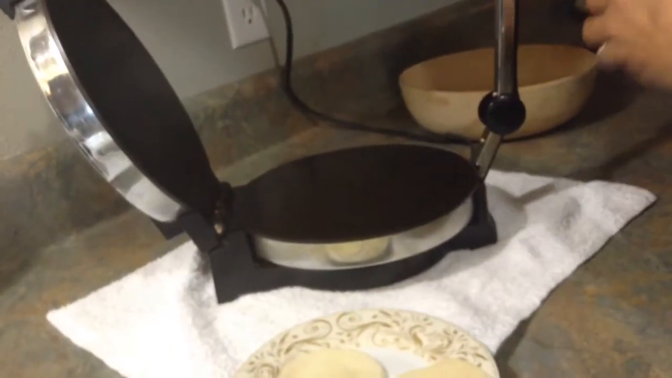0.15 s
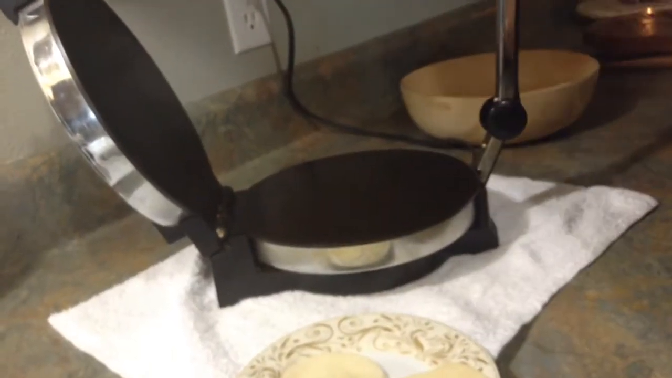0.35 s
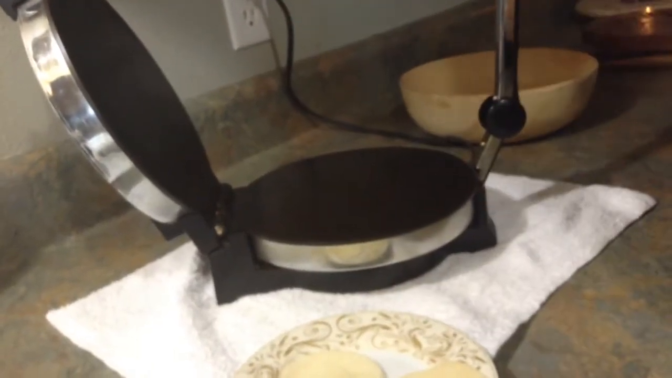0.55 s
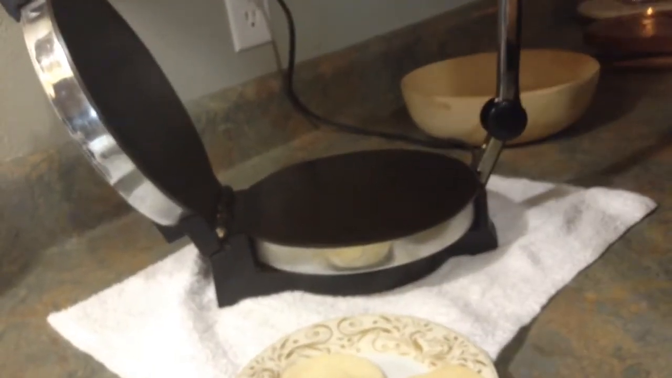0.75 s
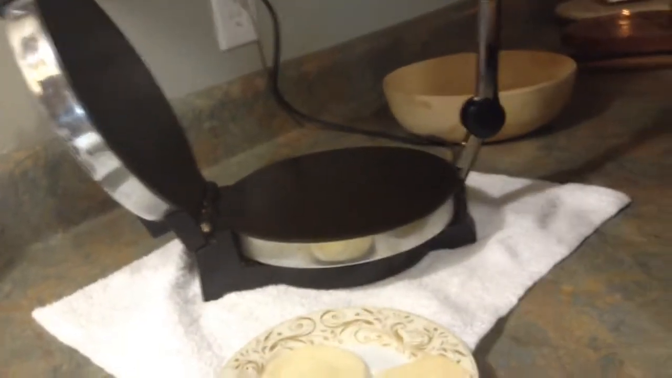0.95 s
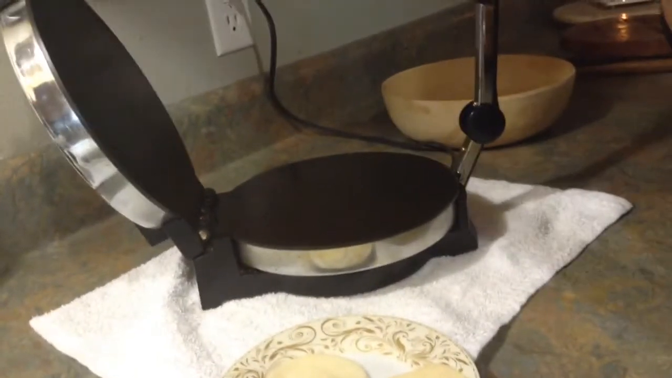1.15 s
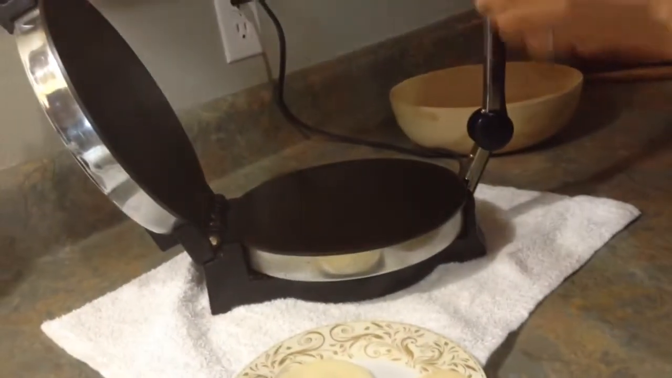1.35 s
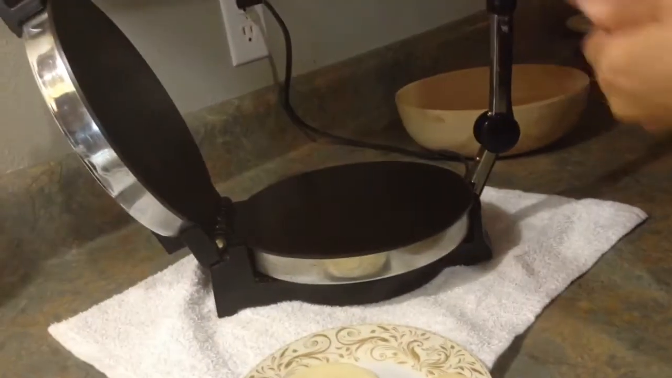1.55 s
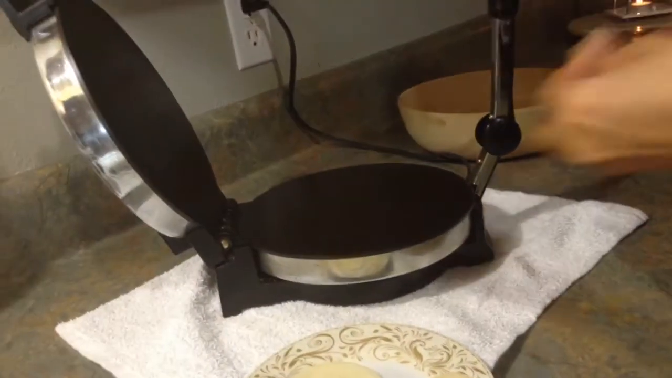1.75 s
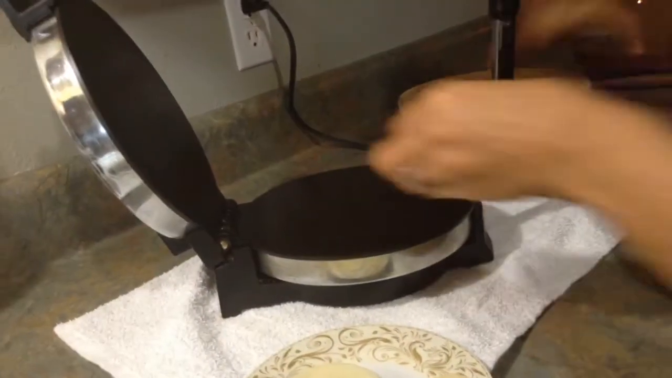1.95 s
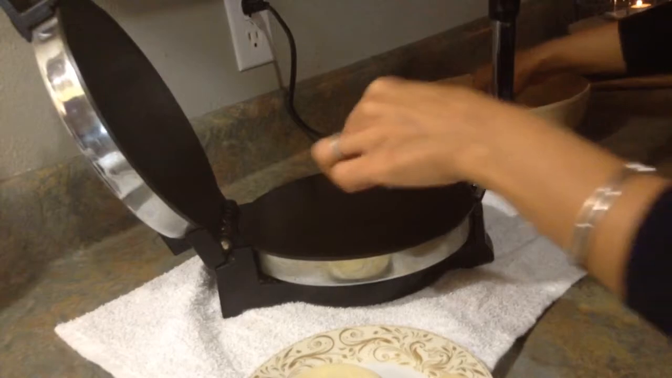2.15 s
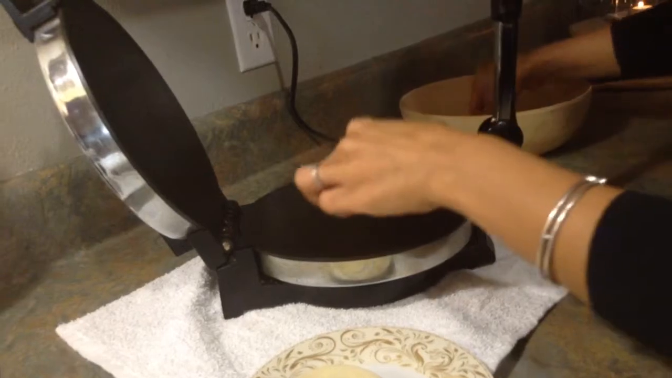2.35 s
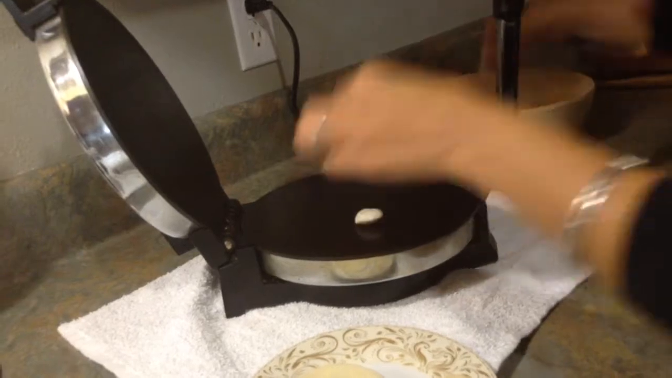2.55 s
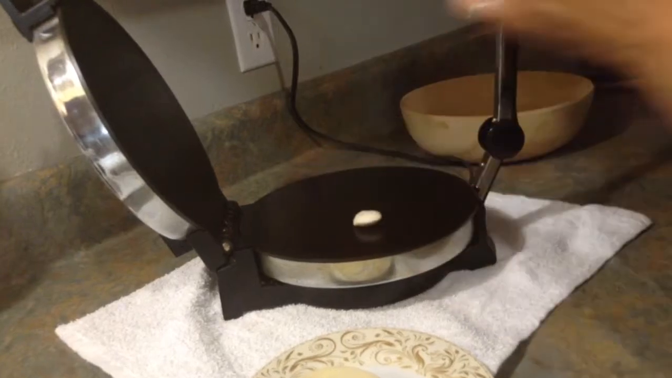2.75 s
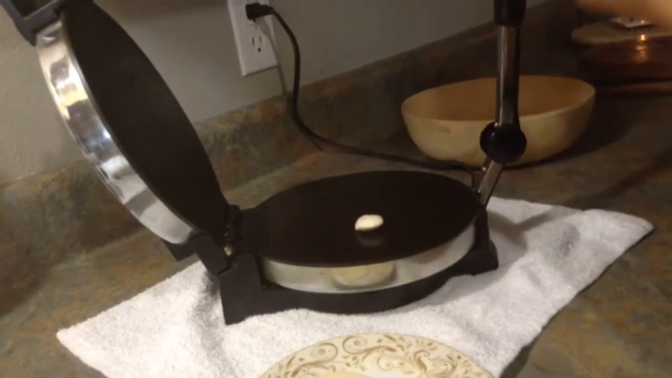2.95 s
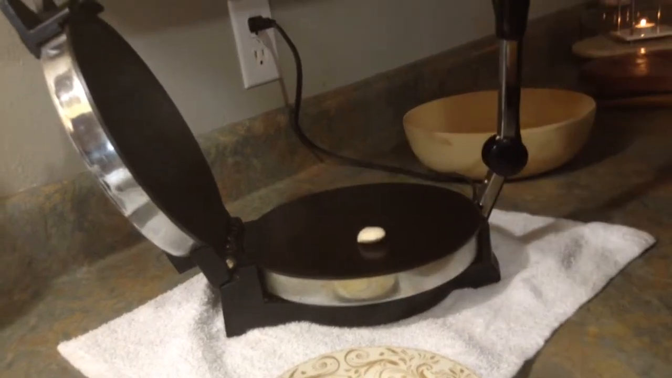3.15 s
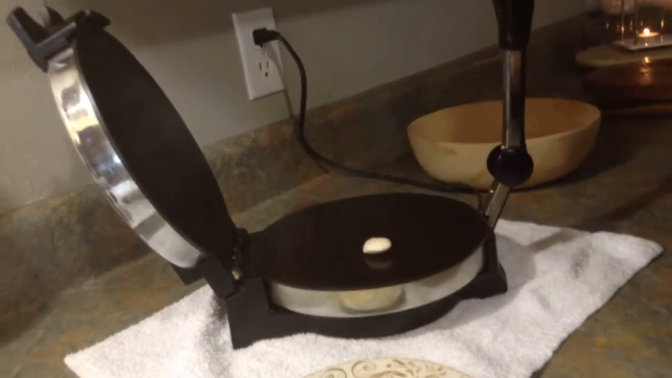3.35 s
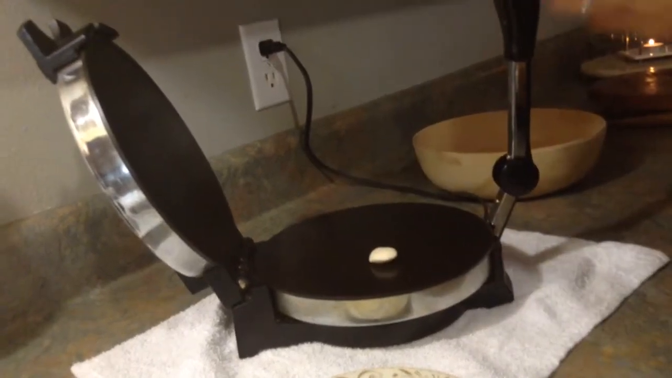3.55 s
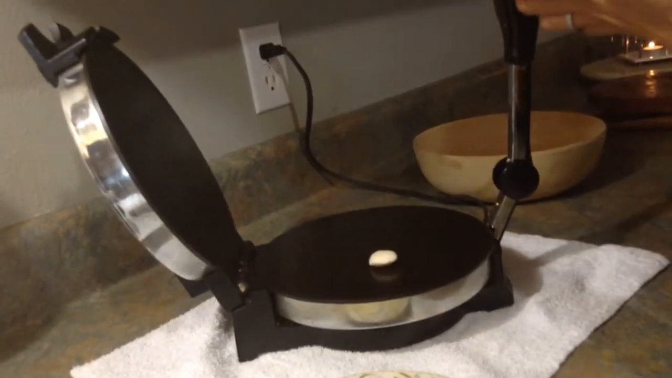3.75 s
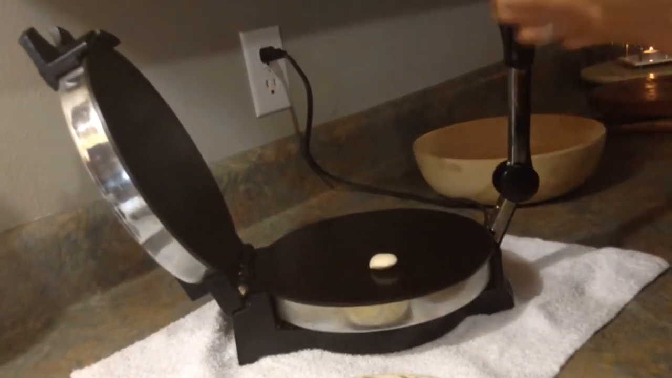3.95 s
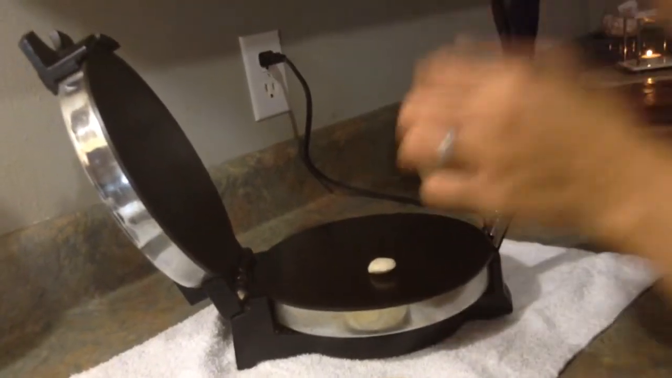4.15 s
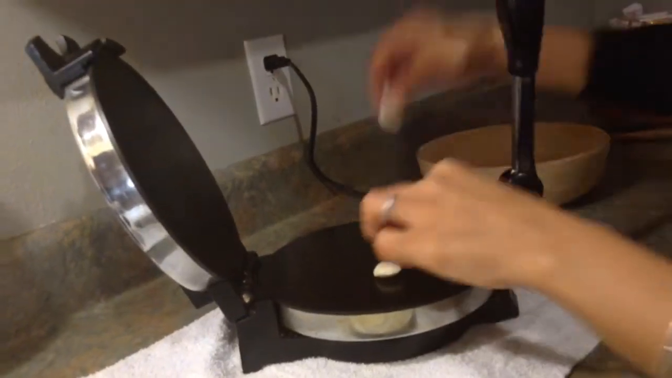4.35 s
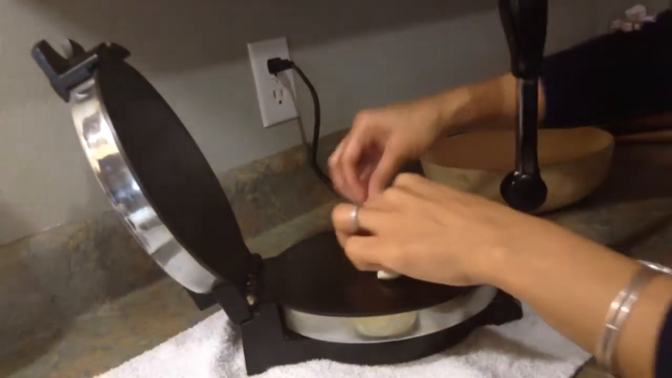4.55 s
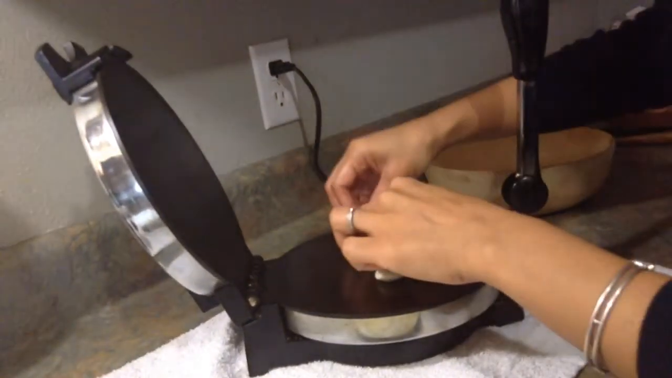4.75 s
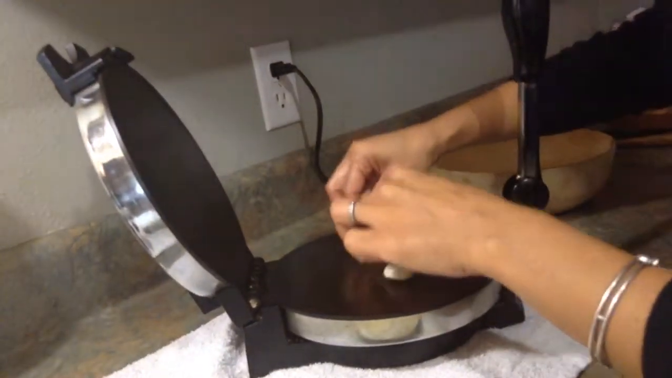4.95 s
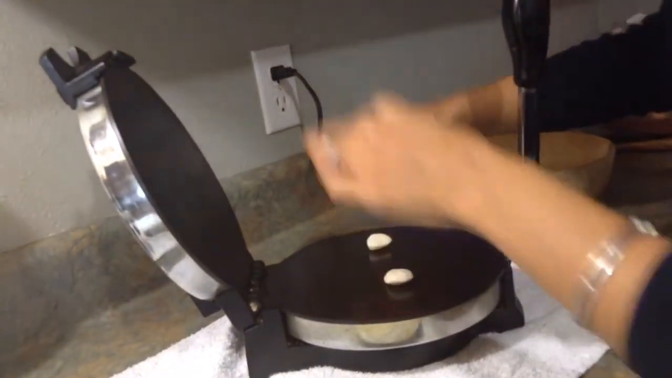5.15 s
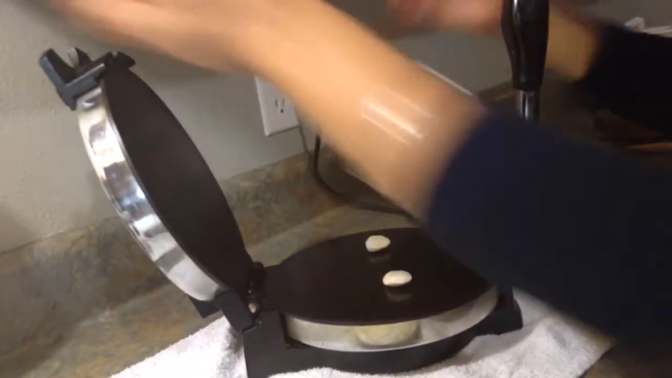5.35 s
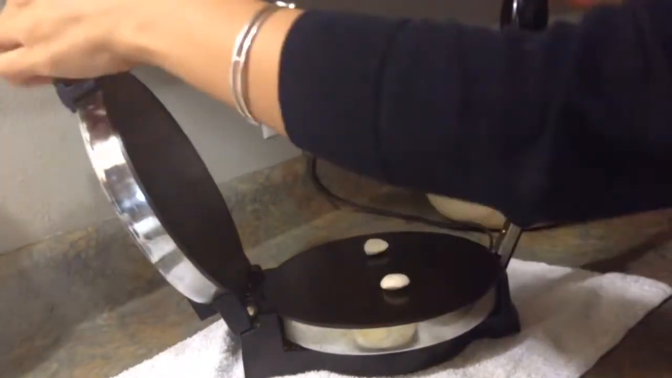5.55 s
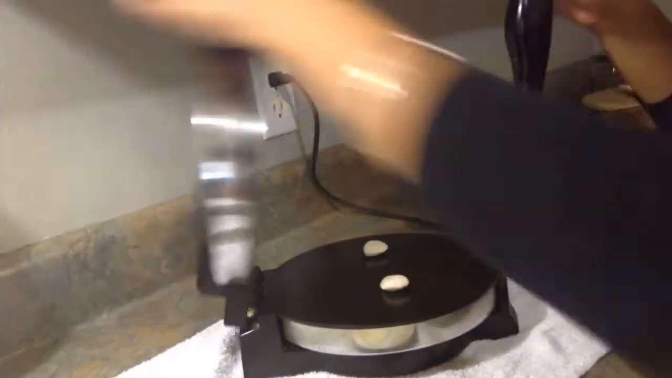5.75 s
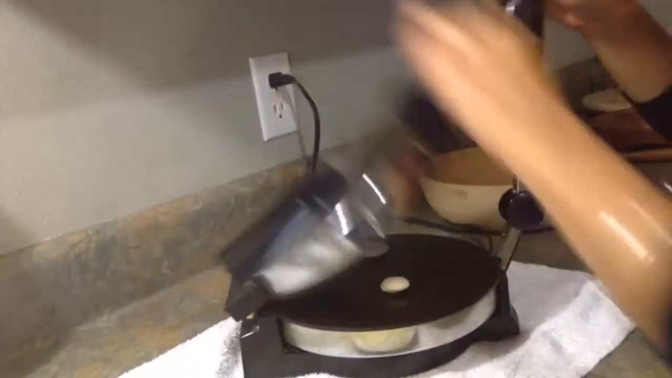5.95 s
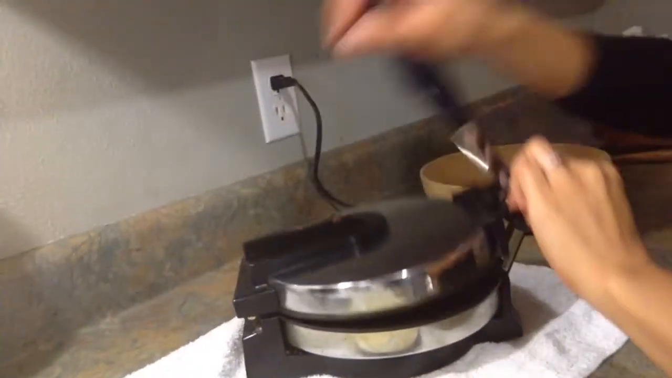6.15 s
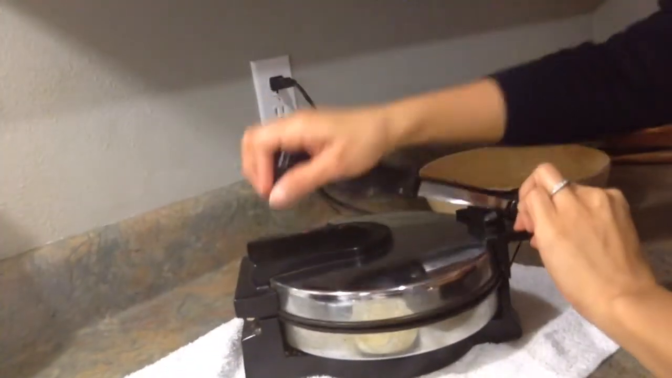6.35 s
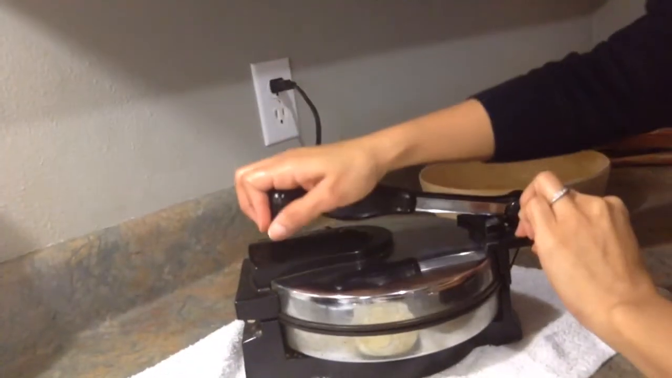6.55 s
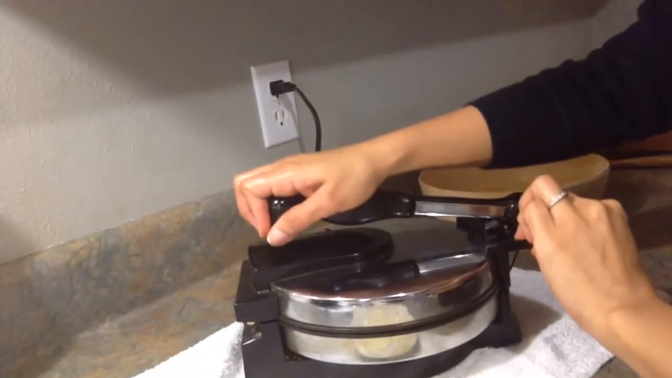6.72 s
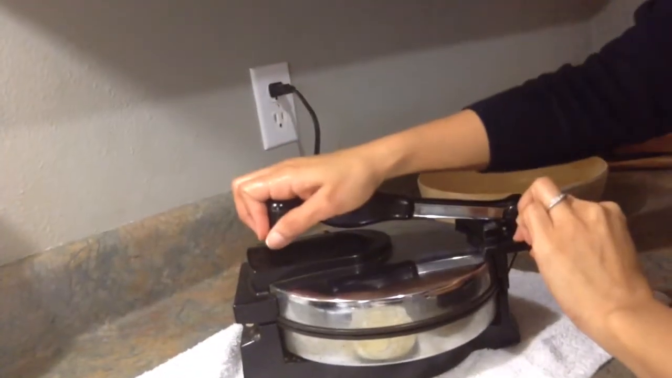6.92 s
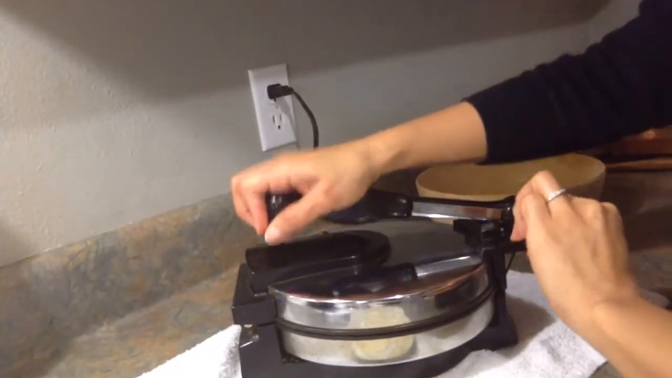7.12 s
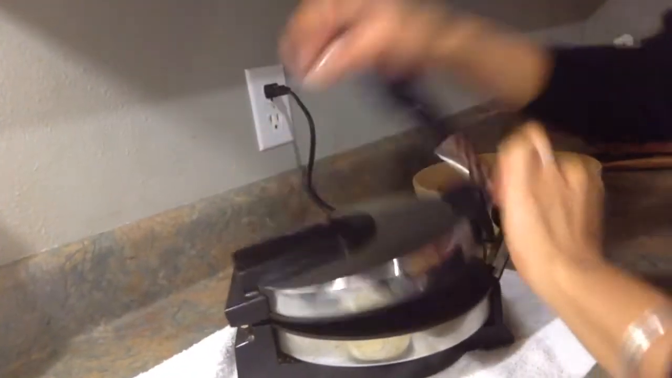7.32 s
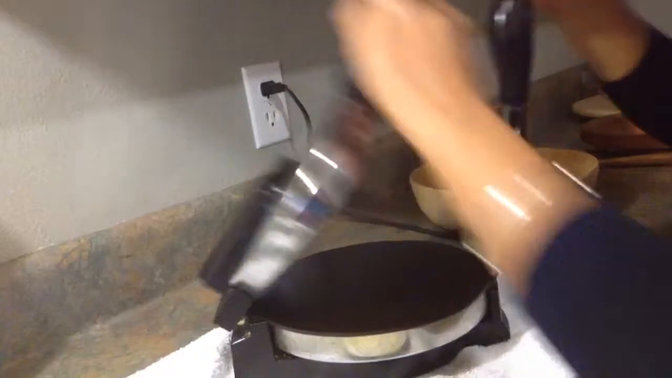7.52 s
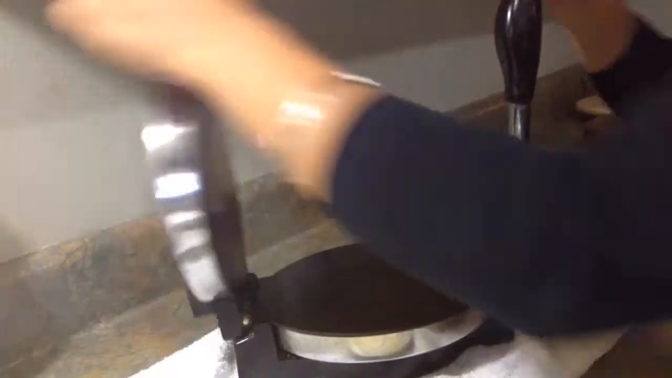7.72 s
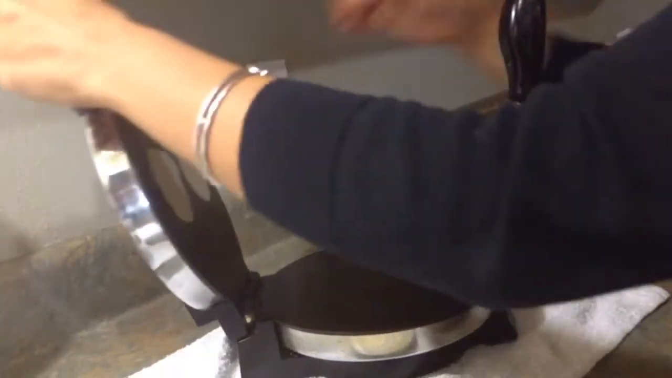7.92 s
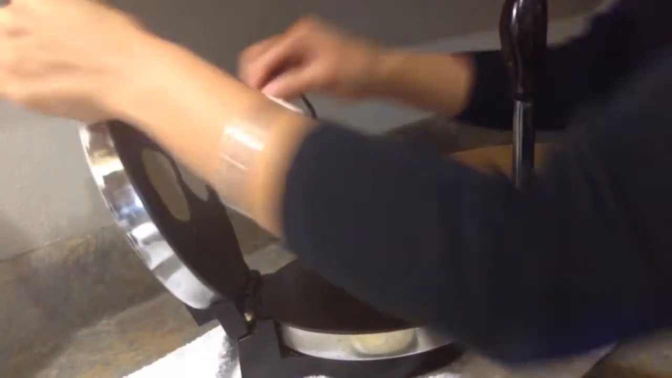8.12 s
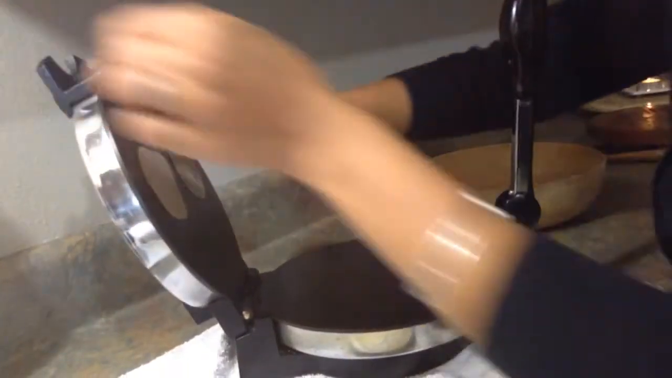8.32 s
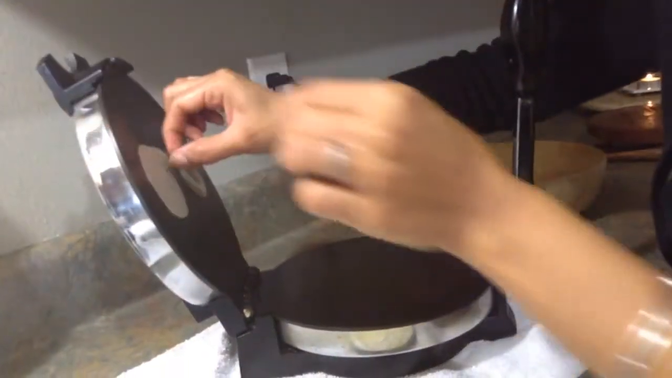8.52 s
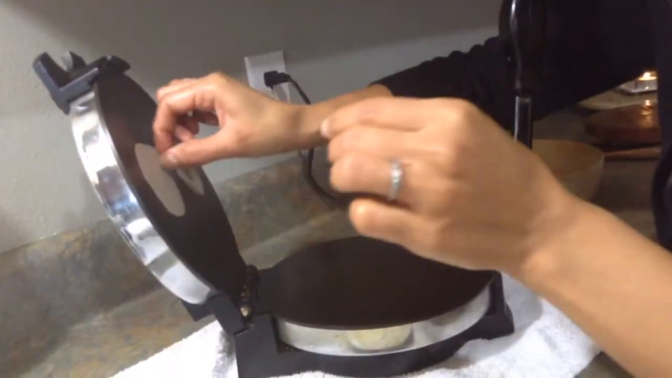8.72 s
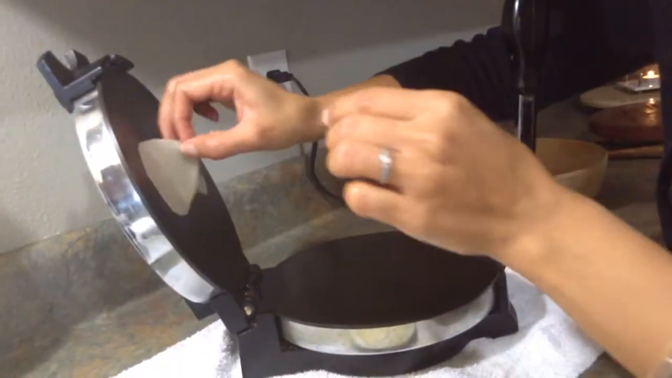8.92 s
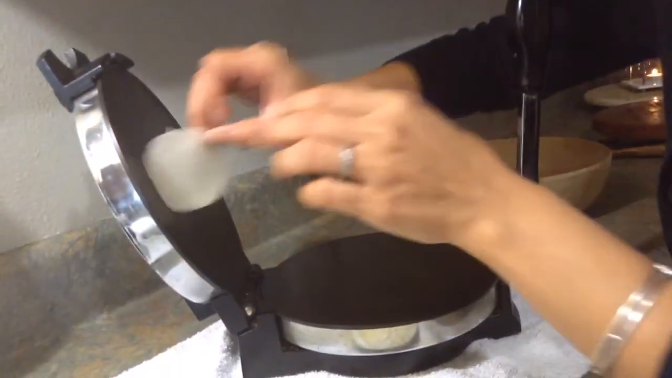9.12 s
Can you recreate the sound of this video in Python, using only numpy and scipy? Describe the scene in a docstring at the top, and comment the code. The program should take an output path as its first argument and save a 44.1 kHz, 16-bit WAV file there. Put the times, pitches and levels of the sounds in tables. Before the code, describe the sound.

A faint hum and soft room air run through a quiet kitchen, with the action close by. From about 0.5 to 1 second, palms rub dough with a dry, hissing swish. Soft pats, tiny ticks and faint bowl clinks follow, then a second rub from 3 to 3.5 seconds. Light finger strokes and ticks continue until 5 seconds, as a faint low drone creeps in. At 5.5 seconds the hinge of a tortilla press knocks softly, and at 6.2 the metal lid shuts with a sharp clank, the loudest sound. For the next second the dough sizzles softly while the lever gives a string of dry clicks and tiny squeaks. A second clank comes at 7.2 seconds as the press is released, then a short squeak. Soft knocks and dull rustles follow until about 8.5 seconds as the lid swings open. A sleeve brushes past around 9 seconds.

```python
"""Dough is rubbed and patted between the palms, then an electric tortilla press clanks shut in a quiet kitchen.
The rubbing is countless tiny slips of skin, coloured by the gap between the hands; a bowl clinks lightly.
The lid knocks ring the metal plates and shake the counter. The lever clicks and squeaks under load
while moisture sizzles out of the dough, and the press is opened again.
A faint hum fills the room; a low drone joins it in the second half."""
import sys
import numpy as np
from scipy import signal
from scipy.fft import rfft, irfft, next_fast_len
from scipy.io import wavfile

SR = 44100
rng = np.random.default_rng(int(sys.argv[2]) if len(sys.argv) > 2 else 0)


def store_pcm(level_fs):
    """Save levels as 16-bit WAV."""
    pcm = np.round(np.clip(level_fs, -1, 1) * 32767).astype(np.int16)
    wavfile.write(sys.argv[1], SR, np.atleast_2d(pcm).T)


N = 409233
TIME = np.arange(N) / SR
RING_TIME = TIME[:SR // 2]

# lid on hinge, stop and lower plate; harder contact, higher cutoff:
# (time [s], level [dB], cutoff [Hz], pitch of struck part [Hz], counter thud level [dB])
LID_KNOCKS = [(5.527, -50, 1670, 1290, -57), (5.57, -50.5, 1880, 1020, -55.5), (5.614, -53, 1490, 683, -59),
              (6.238, -18, 3900, 1470, -44), (7.204, -25, 2740, 1080, -48.5),
              (7.3645, -44.5, 6040, 2400, -51), (7.508, -49, 2100, 2840, -52),
              (7.878, -51.5, 863, 1105, -49.5), (7.931, -53, 2300, 2640, -57.5),
              (8.136, -48.5, 2120, 1710, -66)]
# dense, short-lived modes of an impact: (frequency [Hz], density [dB])
CRACK_SPECTRUM = [(30, -45), (150, -16), (300, -6), (700, 0), (1500, -3), (2800, 1), (4500, 0), (6500, 0),
                  (9500, -2), (11500, -12), (13500, 1), (16000, 0)]


def amp(db):
    """Decibels to gain."""
    return np.exp(np.asarray(db) * (np.log(10) / 20))


def unit(x):
    """Scales to rms 1."""
    return x / np.sqrt(np.mean(x ** 2) + 1e-20)


def struck(x, size=350):
    """Scales the first samples of a blow (8 ms by default) to rms 1."""
    return x / np.sqrt(np.mean(x[:size] ** 2))


def read(points, hz):
    """Interpolates a table on a log-frequency axis."""
    f, value = np.transpose(points)
    return np.interp(np.log(hz + 1), np.log(f + 1), value)


def colour(x, spectrum):
    """Imposes a spectrum; rms 1."""
    size = next_fast_len(len(x))
    gain = amp(read(spectrum, np.fft.rfftfreq(size, 1 / SR)))
    return unit(irfft(rfft(x, size) * gain, size)[:len(x)])


def cut(x, hz, kind, order=2):
    """Butterworth low-pass or high-pass."""
    return signal.sosfilt(signal.butter(order, min(hz, SR / 2 - 100), kind, fs=SR, output="sos"), x)


def resonate(x, hz, width_hz, order=1):
    """Resonance that can follow a moving frequency."""
    carrier = np.exp(2j * np.pi * np.cumsum(hz * np.ones(len(x))) / SR)
    pole = np.exp(-np.pi * width_hz / SR)
    baseband = signal.lfilter([(1 - pole) ** order], np.poly([pole] * order), x * carrier.conj())
    return 2 * (carrier * baseband).real


def fuzzy_tone(hz, width_hz, size=N):
    """Noise narrowed to one wavering line."""
    return unit(resonate(rng.standard_normal(size), hz, width_hz, order=2))


def grainy(rate_per_s, spread_db, share):
    """Smooth noise plus uneven grains that carry the given share of the power."""
    grains = rng.standard_normal(N) * (rng.random(N) < rate_per_s / SR)
    grains *= amp(spread_db * np.minimum(rng.exponential(1, N), 4))
    return np.sqrt(share) * unit(grains) + np.sqrt(1 - share) * rng.standard_normal(N)


def patchy(x, depth_db):
    """Random time-frequency patches swell and fade."""
    spectra = signal.stft(x, SR, nperseg=512, noverlap=384)[2]
    patch = np.outer(np.hanning(22), np.hanning(14))  # bins by frames
    field = unit(signal.fftconvolve(rng.standard_normal(spectra.shape), patch, "same"))
    return unit(signal.istft(spectra * amp(depth_db * field), SR, nperseg=512, noverlap=384)[1][:N])


def decay(t60_s, t=RING_TIME):
    """Exponential fall, 60 dB in t60_s."""
    return amp(-60 * t / t60_s)


def attack(rise_s):
    """Exponential rise to 1."""
    return 1 - np.exp(-RING_TIME / rise_s)


def envelope(start_s, hold_s, rise_s, release_s, fade_db_per_s):
    """Linear rise and release on a steady fade; the release begins hold_s after the start."""
    t = TIME - start_s
    gate = np.clip(t / rise_s, 0, 1) * np.clip(1 - (t - hold_s) / release_s, 0, 1)
    return gate * amp(-fade_db_per_s * np.maximum(t, 0))


def swells(rows):
    """One smooth swell per (middle [s], level [dB], length [s])."""
    return sum(amp(db) * np.cos(np.pi * np.clip((TIME - s) / length_s, -.5, .5)) ** 2
               for s, db, length_s in rows)


def ring(modes, uneven_db, detune=0):
    """Decaying modes, weighted and optionally detuned at random for each blow."""
    weight, offset = rng.standard_normal((2, len(modes)))
    out = np.zeros(len(RING_TIME))
    for k, (hz, db, t60_s) in enumerate(modes):
        tone = np.sin(2 * np.pi * hz * (1 + detune * offset[k]) * RING_TIME)
        out += (-1) ** k * amp(db + uneven_db * weight[k]) * decay(t60_s) * tone
    return out


def add(mix, s, sound):
    """Mixes a sound in at time s."""
    part = mix[round(s * SR):][:len(sound)]
    part += sound[:len(part)]


def background(air_db=-71, hum_hz=241, hum_db=-78.5, hum_dip_db=-6.5):
    """Steady air, a wavering hum, and a low drone; the hum weakens as the drone grows."""
    # room air: (frequency [Hz], density [dB])
    air_spectrum = [(20, -44), (60, -28), (100, -13), (150, -1.5), (220, -5.5), (320, -8), (900, -8),
                    (1500, -14), (3000, -16), (4500, -14), (7000, -16.5), (16000, -15.5)]
    # drone growth: (time [s], level [dB])
    drone_levels = [(3.4, -105), (4.5, -83), (5.5, -74.5), (7.0, -75), (7.4, -66)]
    # drone lines: (frequency [Hz], width [Hz], level [dB])
    drone_modes = [(78.5, 4.3, -10.5), (120, 25, -10.5), (150.5, 49, -2), (195.4, 13, -2.5)]
    air = amp(air_db) * colour(rng.standard_normal(N), air_spectrum)
    drone_db = np.interp(TIME, *np.transpose(drone_levels))
    growth = (drone_db - drone_db.min()) / np.ptp(drone_db)
    hum = unit(np.sin(2 * np.pi * hum_hz * TIME) + .5 * fuzzy_tone(hum_hz, width_hz=7.1))
    drone = unit(sum(amp(db) * fuzzy_tone(hz, width_hz) for hz, width_hz, db in drone_modes))
    return air + amp(hum_db + hum_dip_db * growth ** 2) * hum + amp(drone_db) * drone


def kitchen(x, near_db, tail_db, near_t60_s=.046):
    """Direct sound, quick scatter from counter and wall, and a tail that dies faster in the treble."""
    # reverberation: (frequency [Hz], t60 [s])
    reverb_times = [(100, .36), (400, .38), (800, .5), (3000, .42), (7000, .35), (15000, .22)]
    size = len(RING_TIME)
    hz, t, spectra = signal.stft(rng.standard_normal(size), SR, nperseg=256)
    spectra *= decay(read(reverb_times, hz)[:, None], t)
    tail = signal.istft(spectra, SR, nperseg=256)[1][:size] * attack(.012)
    near = rng.standard_normal(size) * decay(near_t60_s) * (RING_TIME > .002)
    response = amp(tail_db) * tail / np.linalg.norm(tail) + amp(near_db) * near / np.linalg.norm(near)
    response[0] += 1
    return signal.oaconvolve(x, response)[:N]


def sleeve(centre_hz=3380, width_hz=3100):
    """Cloth brushes past in broad, soft swishes."""
    # swishes: (middle [s], level [dB], length [s])
    brushes = [(1.585, -62, 0.065), (6.184, -57, 0.096), (8.87, -68, 0.12), (9.067, -56.5, 0.12)]
    return swells(brushes) * cut(fuzzy_tone(centre_hz, width_hz), centre_hz / 2, "high")


def swings():
    """Dull rustle of sleeve and hinge as the arm swings the lid, fastest at first."""
    # arm movements: (start [s], hold [s], level [dB])
    moves = [(5.509, 0.39, -63.5), (7.209, 0.19, -54), (7.495, 0.29, -68), (8.076, 0.45, -65),
             (8.998, 0.12, -67.5)]
    # rustle: (frequency [Hz], density [dB])
    scrape_spectrum = [(30, -47), (300, -5), (700, -1.5), (1000, 2.5), (1500, 1), (2300, -6), (4200, -8),
                       (6000, -23), (15000, -28)]
    speed = sum(amp(db) * envelope(s, hold_s, rise_s=.012, release_s=.15, fade_db_per_s=4.5)
                for s, hold_s, db in moves)
    return speed * colour(grainy(rate_per_s=1100, spread_db=1.5, share=.31), scrape_spectrum)


def bowl(rise_s=.003, scuff_db=-11, scuff_t60_s=.15):
    """A hand with a bracelet scuffs the bowl and rings it lightly."""
    # touches: (time [s], level [dB])
    clinks = [(2.066, -69), (2.280, -56), (2.856, -63), (2.975, -69), (4.449, -67)]
    # bowl modes: (frequency [Hz], level [dB], t60 [s])
    bowl_modes = [(1070, -2, 0.1), (2130, -16, 0.12), (2920, -11, 0.12), (3460, -13, 0.18),
                  (4570, 3.5, 0.054), (5600, -15, 0.071)]
    out = np.zeros(N)
    for s, db in clinks:
        noise = colour(rng.standard_normal(len(RING_TIME)), CRACK_SPECTRUM)
        scuff = struck(cut(noise, 3200, "low") * decay(scuff_t60_s))
        clink = struck(ring(bowl_modes, uneven_db=2))
        add(out, s, amp(db) * struck((clink + amp(scuff_db) * scuff) * attack(rise_s)))
    return out


def ticks(t60_s=.011, faint_per_s=3, faint_db=-75, faint_hz=7000):
    """Snaps of jewellery, sticky fingers and bursting steam, with fainter ones at random times."""
    # snaps: (time [s], level [dB], band pitch [Hz])
    snaps = [(1.593, -60.5, 3100), (2.752, -58.5, 13500), (2.856, -52, 4900), (3.173, -46, 9000),
             (4.5475, -55, 13500), (4.651, -62, 12800), (4.809, -54.5, 13500), (4.877, -63, 7000),
             (5.357, -61, 2600), (6.870, -44, 12000), (6.898, -49, 12000), (6.9153, -43, 12000),
             (7.068, -54, 4000), (8.10, -58.5, 2180), (9.13, -60, 2800)]
    out, t = np.zeros(N), TIME[:SR // 16]
    draws = rng.random((round(faint_per_s * N / SR), 2))
    faint = [(when * N / SR, faint_db, faint_hz * (.5 + pitch)) for when, pitch in draws]
    for s, db, hz in snaps + faint:
        burst = rng.standard_normal(len(t)) * decay(t60_s, t)
        snap = cut(cut(burst, hz * .55, "high"), hz * 1.15, "low", order=6)
        add(out, s, amp(db) * struck(snap))
    return out


def squeaks(width_share=.04):
    """Brief whistles of dough, steam and hinge."""
    # whistles: (middle [s], level [dB], pitch [Hz], length [s])
    whistles = [(1.264, -54, 11960, 0.06), (6.184, -60.5, 2210, 0.082), (6.933, -42, 6500, 0.012),
                (7.069, -51.5, 1036, 0.02), (7.404, -47, 732, 0.062), (7.53, -59, 735, 0.1)]
    out = np.zeros(N)
    for s, db, hz, length_s in whistles:
        size = int(length_s * SR)
        whistle = cut(fuzzy_tone(hz, width_share * hz, size), hz / 2, "high")
        add(out, s - length_s / 2, amp(db) * whistle * np.hanning(size))
    return out


def pats(t60_s=.058, rise_s=.0008, close_s=.006, dish_db=-8):
    """Patted dough puffs air through the cupped hand, whose pitch drops as it closes; a dish answers."""
    # pats: (time [s], level [dB], mid-glide pitch of the hollow [Hz])
    dough_pats = [(0.465, -50.5, 1820), (0.639, -67, 764), (1.741, -57, 1680), (2.259, -57, 800),
                  (2.806, -56.5, 1490), (3.0507, -59, 2270), (3.828, -58.5, 1450), (4.821, -59.5, 1400)]
    # dish modes: (frequency [Hz], level [dB], t60 [s])
    dish_modes = [(916, 4, 0.23), (1234, 0, 0.31), (1640, 2, 0.18)]
    out = np.zeros(N)
    for s, db, hz in dough_pats:
        puff = rng.standard_normal(len(RING_TIME)) * decay(t60_s) * attack(rise_s)
        falling_hz = hz * (.7 + .6 * np.exp(-RING_TIME / close_s))
        hollow = resonate(puff, falling_hz, width_hz=hz / 2)
        hollow = cut(cut(hollow, hz / 2, "high", order=4), hz * 2, "low", order=4)
        dish = amp(dish_db) * struck(ring(dish_modes, uneven_db=1))
        add(out, s, amp(db) * struck(struck(hollow) + dish))
    return out


def gap_hiss(hz, width_hz, waver_s=.028, waver_share=.035, flutter_db=1.5):
    """Hiss in a gap of unsteady hands; pitch and level waver."""
    drift, flutter = (unit(cut(rng.standard_normal(N), 1 / (2 * waver_s), "low")) for _ in range(2))
    hiss = cut(fuzzy_tone(hz * np.exp(waver_share * drift), width_hz), 1100, "high")
    return unit(hiss * amp(flutter_db * flutter))


def palms(gain_db=.5, hollow_db=-20, narrow_gap_hz=4060, finger_db=-17, finger_hz=6300):
    """Tiny slips of skin on dough; gaps between palms and fingers sing higher as they close."""
    # one curve per rub, long push then short pull: (time [s], pressure [dB], palm gap resonance [Hz])
    rubs = [
        [(.475, -63, 1500), (.508, -43, 1510), (.566, -38, 1590), (.614, -41, 2230), (.652, -35.5, 3300),
         (.73, -38.5, 4170), (.76, -43, 3630), (.795, -38.5, 2500), (.828, -36.5, 2200), (.95, -81, 1500)],
        [(3.01, -65, 1500), (3.06, -55.5, 1500), (3.076, -42, 1520), (3.15, -40, 1610), (3.182, -38, 4350),
         (3.24, -39, 3880), (3.29, -42.5, 4500), (3.33, -46, 3720), (3.366, -39, 2740), (3.398, -41.5, 1490),
         (3.5, -70, 1400)],
    ]
    # light finger strokes: (middle [s], level [dB], length [s])
    strokes = [(0.323, -61, 0.15), (1.031, -63, 0.085), (1.108, -62.5, 0.11), (2.896, -59.5, 0.2),
               (3.591, -58.5, 0.11), (3.687, -63.5, 0.16), (3.842, -59, 0.16)]
    # skin friction: (frequency [Hz], density [dB])
    skin_spectrum = [(300, -65), (900, -21), (2300, -22), (3500, -8), (5300, -5), (6500, -2.5), (8800, 2),
                     (11000, 1), (13000, 5.5), (16000, -3)]
    pressure = sum(amp(np.interp(TIME, s, db, left=-np.inf, right=-np.inf))
                   for s, db, _ in map(np.transpose, rubs))
    knot_s, _, knot_hz = np.vstack(rubs).T
    gap_hz = np.interp(TIME, knot_s, knot_hz)
    closure = gap_hz / narrow_gap_hz
    slips = patchy(grainy(rate_per_s=3500, spread_db=2.6, share=.25), depth_db=2.2)
    hollow = amp(hollow_db) * np.sqrt(closure) * gap_hiss(gap_hz, width_hz=720)
    fingers = amp(finger_db) * gap_hiss(finger_hz * closure ** .2, width_hz=1440)
    return amp(gain_db) * (pressure + swells(strokes)) * (colour(slips, skin_spectrum) + hollow + fingers)


def sizzle(steam_db=-53, crackle_db=-59):
    """Moisture boils out of the dough between the hot plates; larger bubbles snap above the hiss."""
    # steam: (frequency [Hz], density [dB])
    steam_spectrum = [(200, -16), (550, 0.5), (900, 2.5), (2000, -5.5), (4000, 1.5), (6000, -9), (8500, -2),
                      (11500, -15), (14000, -13), (16000, -6.5)]
    # bubbles: (frequency [Hz], density [dB])
    crackle_spectrum = [(1000, -23.5), (3500, -5), (6500, -3.5), (9000, 2), (11500, -6), (14000, 3.5),
                        (16000, 1.5)]
    bursts = patchy(grainy(rate_per_s=900, spread_db=3.2, share=.45), depth_db=1.8)
    crackles = colour(grainy(rate_per_s=81, spread_db=3, share=1), crackle_spectrum)
    boil = envelope(start_s=6.14, hold_s=1, rise_s=.11, release_s=.17, fade_db_per_s=5)
    return boil * (amp(steam_db) * colour(bursts, steam_spectrum) + amp(crackle_db) * crackles)


def counter_thuds(lag_s=.0037, rise_s=.0039):
    """At each lid knock the base shakes the counter through a towel."""
    # counter modes: (frequency [Hz], level [dB], t60 [s])
    counter_modes = [(76, -17, .2), (125, -7, .16), (160, -3, .16), (240, 2, .11), (330, -7, .05)]
    out = np.zeros(N)
    for s, *_, db in LID_KNOCKS:
        shake = cut(ring(counter_modes, uneven_db=1.5) * attack(rise_s), 90, "high")
        add(out, s + lag_s, amp(db) * struck(shake, size=900))
    return out


def blow(cutoff_hz, part_hz, modes, t60_s, ring_db, detune, part_db=-7.5, treble_t60_s=.026):
    """Metal on metal: a crack whose treble dies first, the struck part, and body modes shifted by load."""
    noise = colour(rng.standard_normal(len(RING_TIME)), CRACK_SPECTRUM)
    lows = cut(noise, 4470, "low", order=1)
    crack = lows * decay(t60_s) + (noise - lows) * decay(treble_t60_s)
    part = fuzzy_tone(part_hz, .31 * part_hz, len(RING_TIME)) * decay(t60_s)
    body = ring(modes, uneven_db=1.5, detune=detune) * attack(.0005)
    clack = struck(crack) + amp(part_db) * struck(part) + amp(ring_db) * struck(body)
    return struck(cut(clack, cutoff_hz, "low"))


def lever_clicks(lowest_hz=700):
    """Lever and latch slip under load in thin, dry clicks."""
    # slips: (time [s], level [dB], cutoff [Hz], pitch of slipping part [Hz])
    slips = [(5.838, -57, 4100, 2950), (6.380, -36, 16000, 6500), (6.6338, -36.5, 7500, 2120),
             (6.693, -48.5, 3500, 1990), (6.739, -47.5, 14100, 8240), (6.8042, -34, 11400, 8550),
             (6.847, -34, 7040, 3480), (7.080, -42.5, 4940, 3400), (7.132, -44, 2830, 960),
             (7.392, -42.5, 3270, 1460)]
    # lever and latch modes: (frequency [Hz], level [dB], t60 [s])
    lever_modes = [(975, -4, .055), (1350, -4, .045), (2020, -4, .08), (3540, 1, .035), (4450, -2, .035),
                   (6960, -4, .05)]
    out = np.zeros(N)
    for s, db, cutoff_hz, part_hz in slips:
        click = blow(cutoff_hz, part_hz, lever_modes, t60_s=.045, ring_db=-5, detune=.05)
        add(out, s, amp(db) * cut(click, lowest_hz, "high", order=3))
    return out


def lid_knocks(lowest_hz=299):
    """The lid strikes hinge, stop and lower plate, ringing the press."""
    # press modes: (frequency [Hz], level [dB], t60 [s])
    press_modes = [(335, -15, .08), (457, -7, .09), (610, -7, .07), (689, -15, .42), (754, -8, .1),
                   (931, 5, .085), (1002, 0, .075), (1313, -5, .06), (1378, -9, .26), (1466, 0, .075),
                   (1528, -4, .06), (2049, 4, .05), (2263, -12, .13), (2385, 4, .04), (2551, -1, .05),
                   (2719, 4.5, .05), (3350, -2, .03), (3900, 0, .03), (4280, 2, .03), (4650, 0, .025)]
    out = np.zeros(N)
    for s, db, cutoff_hz, part_hz, _ in LID_KNOCKS:
        knock = blow(cutoff_hz, part_hz, press_modes, t60_s=.062, ring_db=-3.5, detune=.003)
        add(out, s, amp(db) * cut(knock, lowest_hz, "high", order=1))
    return out


def scene():
    """Press and hands in the kitchen, the rubbing drier; mono on two channels."""
    press = lid_knocks() + lever_clicks() + counter_thuds()
    clatter = kitchen(press + bowl() + ticks() + pats() + sizzle() + swings(), near_db=-14, tail_db=-11)
    rubbing = kitchen(palms() + squeaks() + sleeve(), near_db=-16, tail_db=-17)
    return np.tile(clatter + rubbing + background(), (2, 1))


def record(dry):
    """Steep low-pass at the top of the treble."""
    edge_hz = 15600
    taps = signal.firwin(511, edge_hz, window=("kaiser", 9), fs=SR)
    return signal.oaconvolve(dry, taps[None], "same")


dry = scene()
out = record(dry)
store_pcm(out)
```